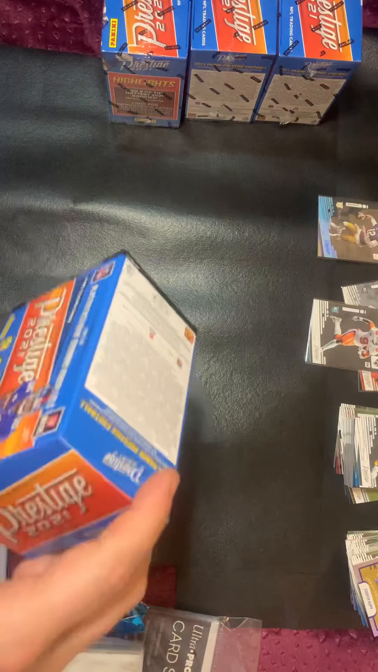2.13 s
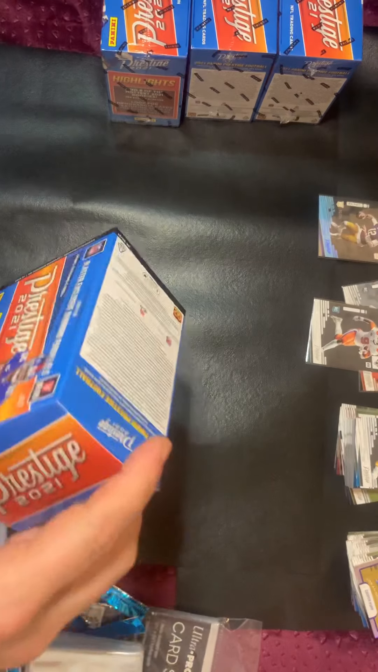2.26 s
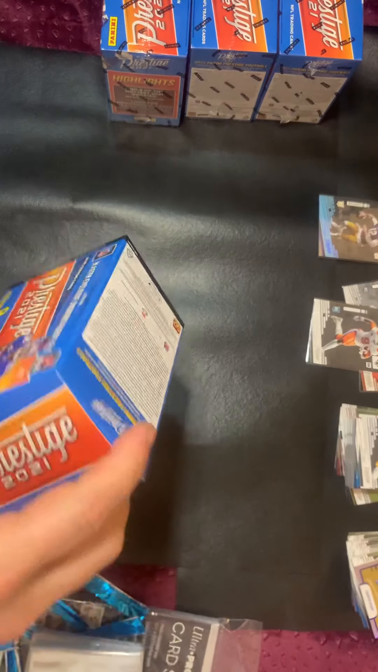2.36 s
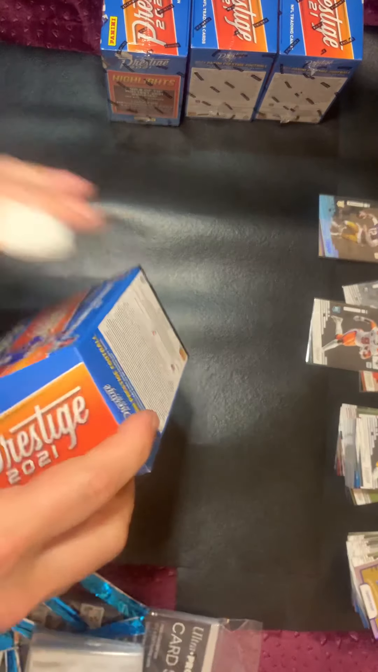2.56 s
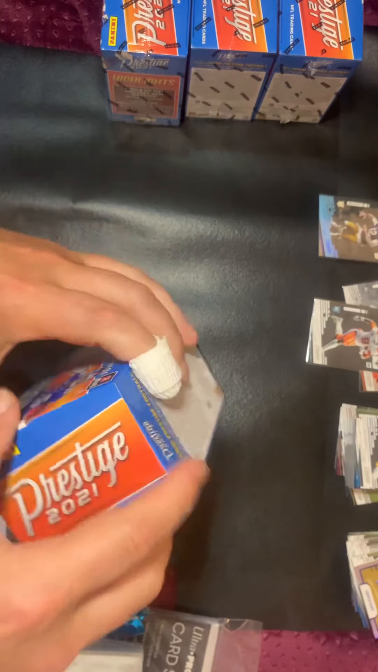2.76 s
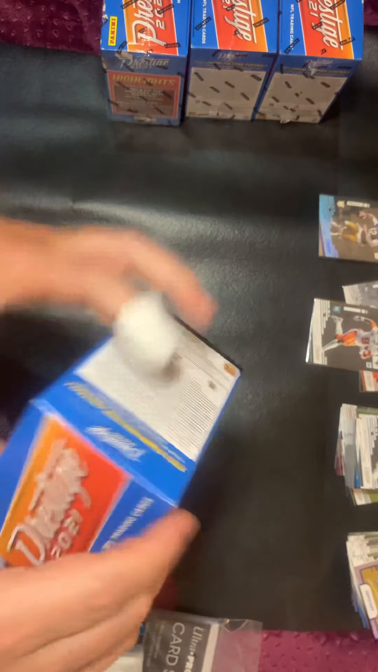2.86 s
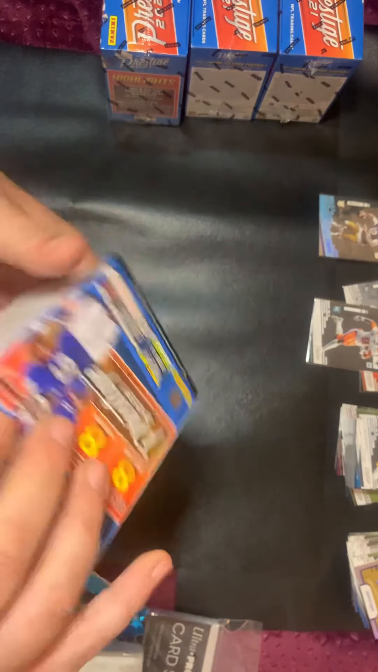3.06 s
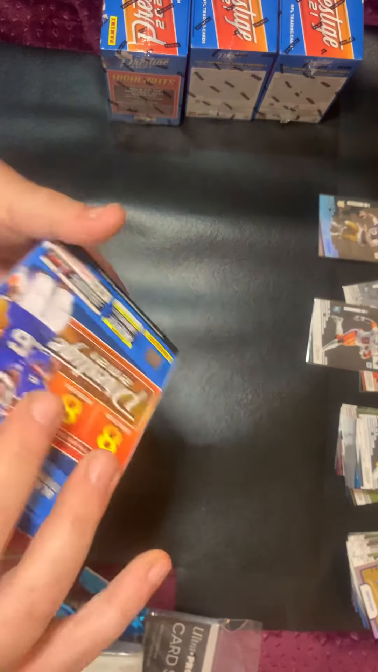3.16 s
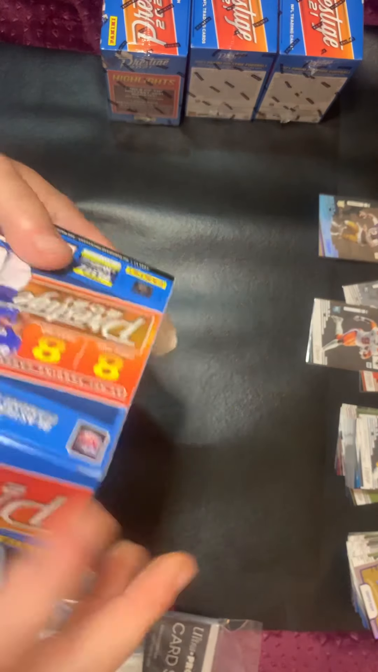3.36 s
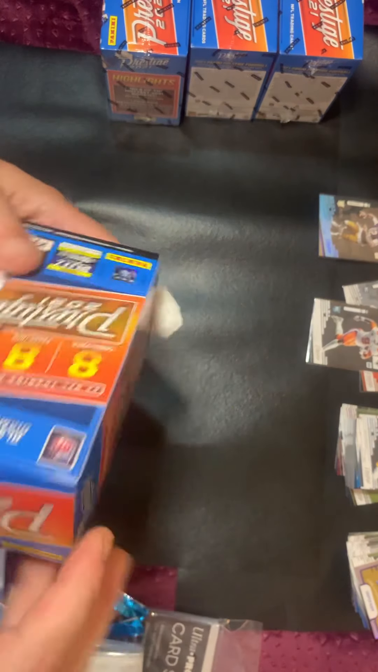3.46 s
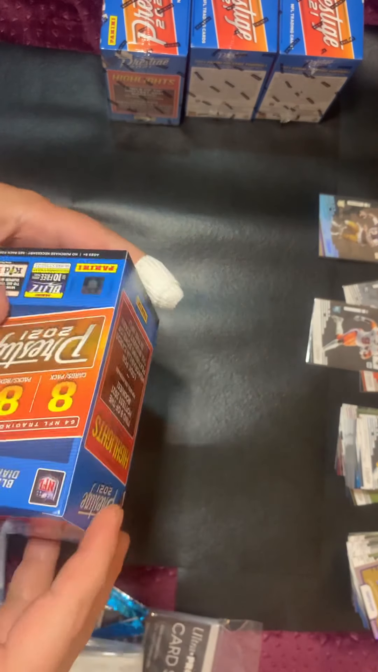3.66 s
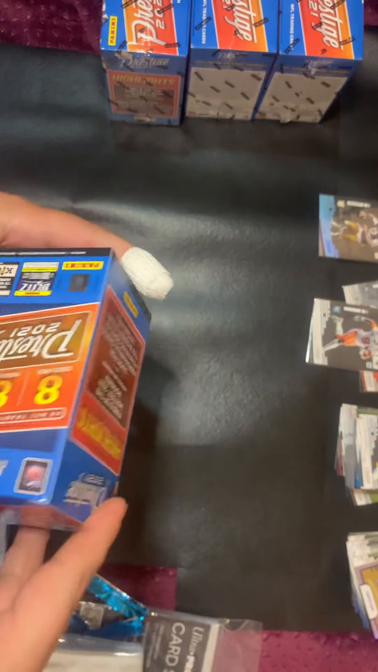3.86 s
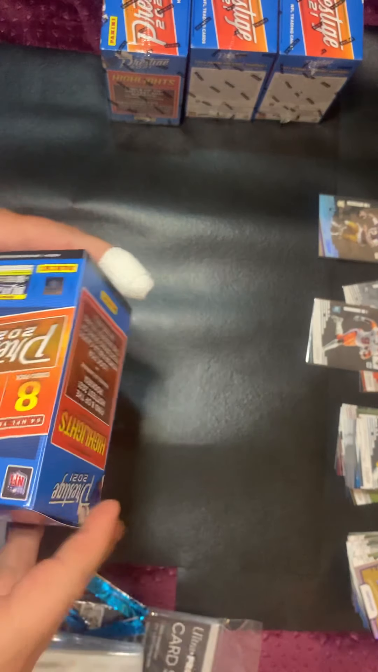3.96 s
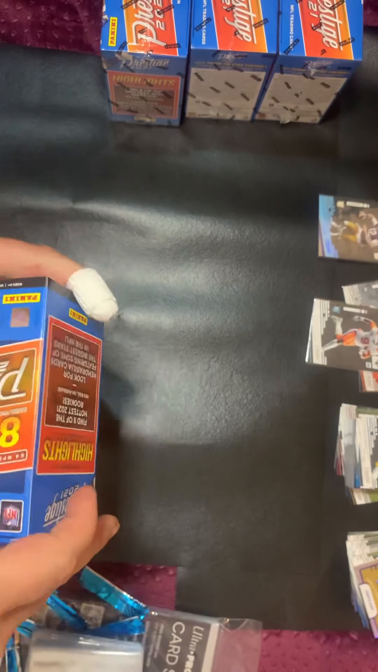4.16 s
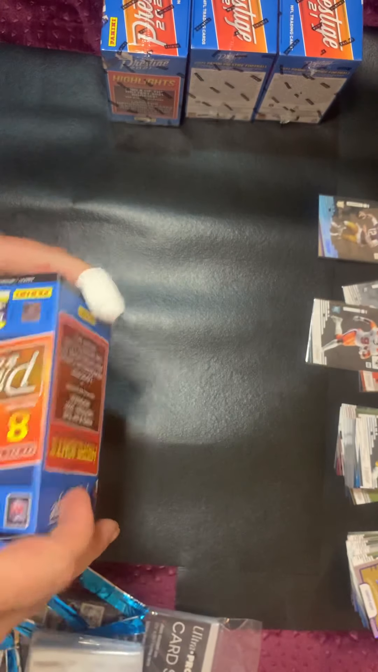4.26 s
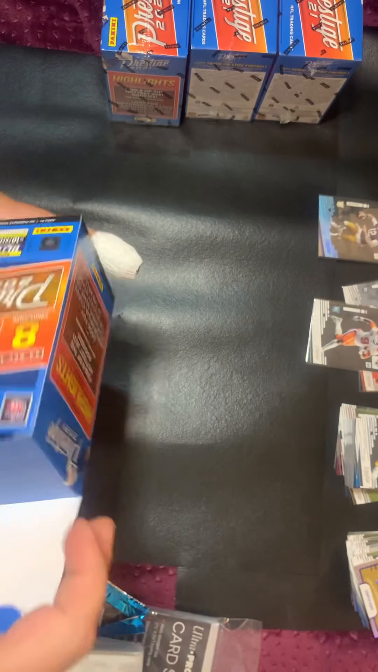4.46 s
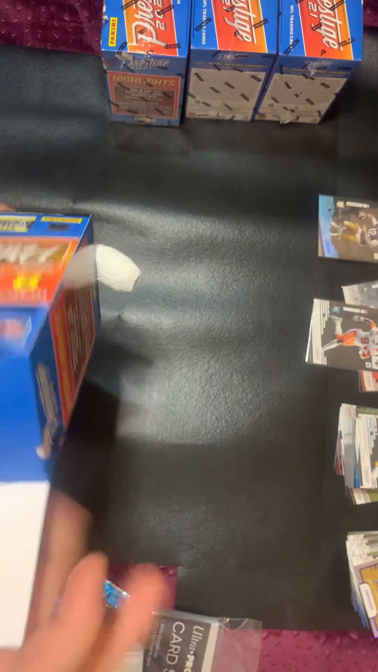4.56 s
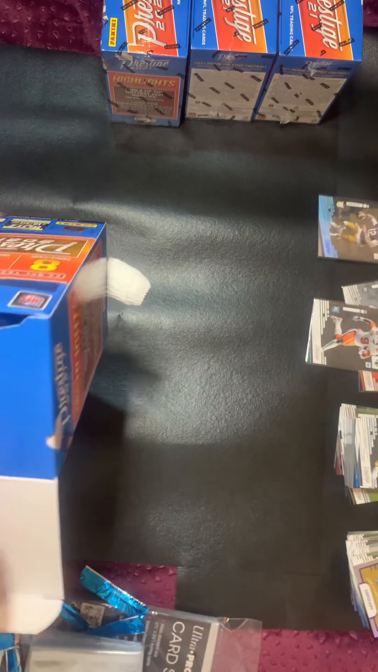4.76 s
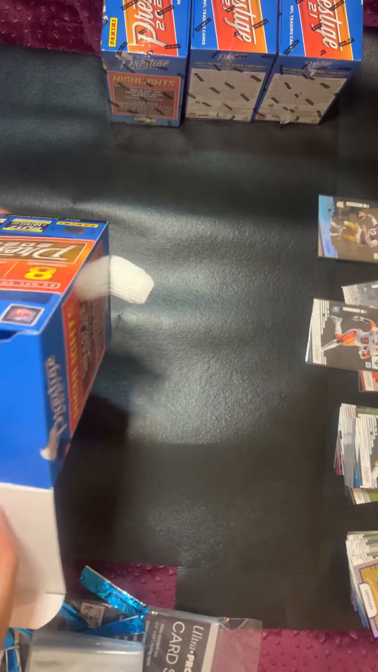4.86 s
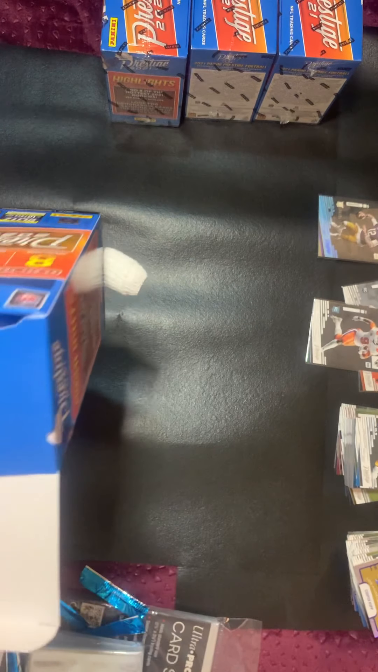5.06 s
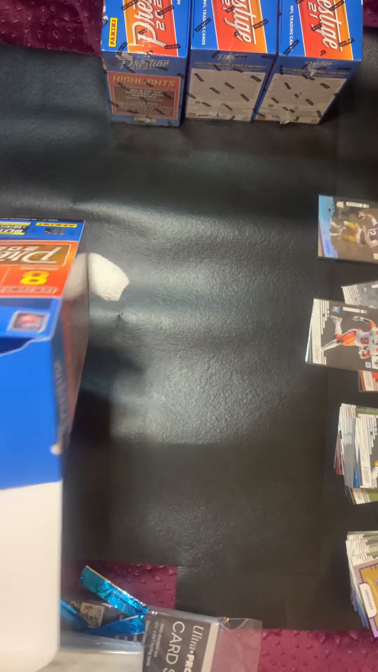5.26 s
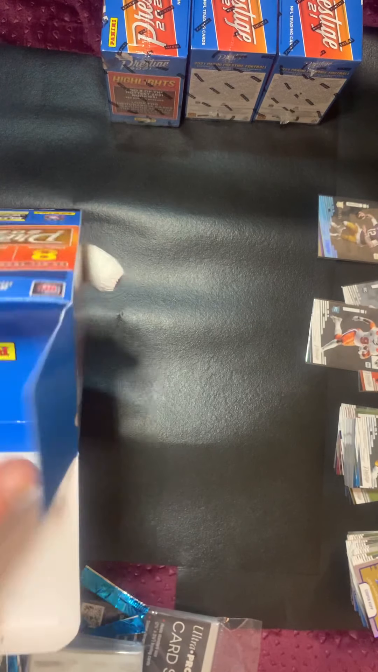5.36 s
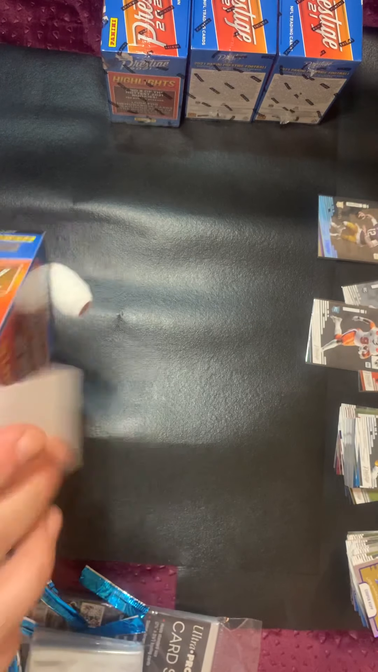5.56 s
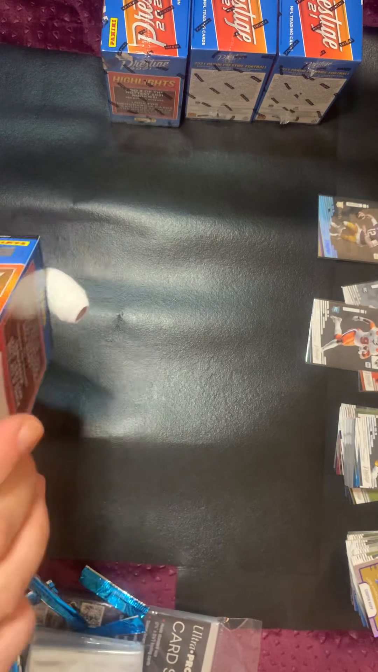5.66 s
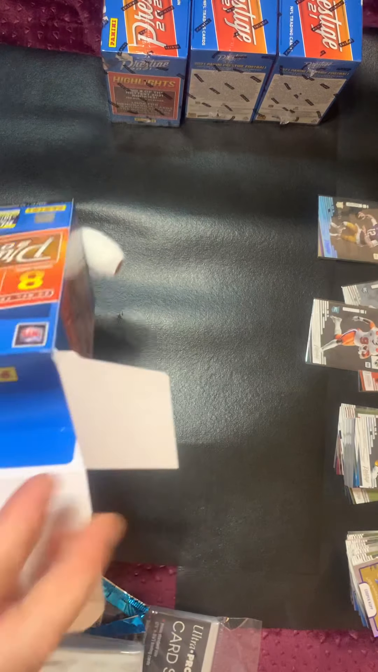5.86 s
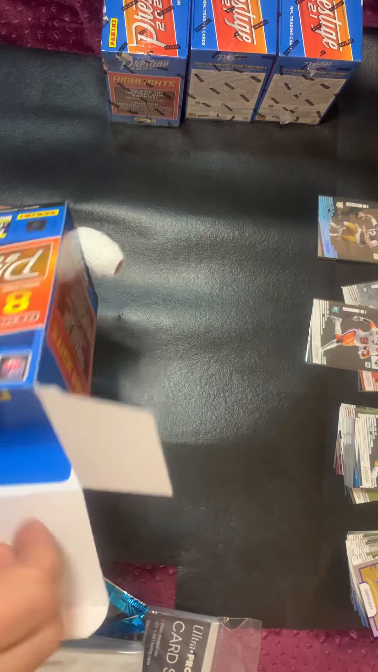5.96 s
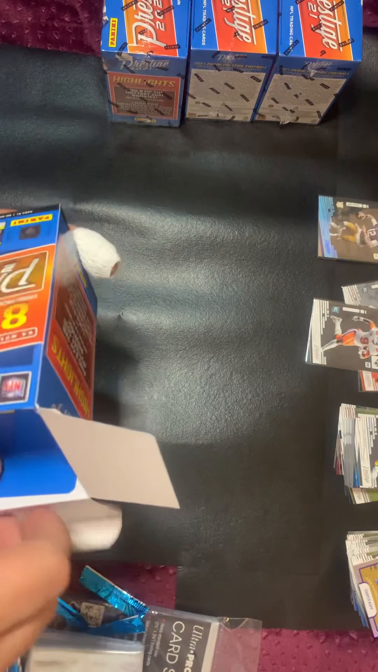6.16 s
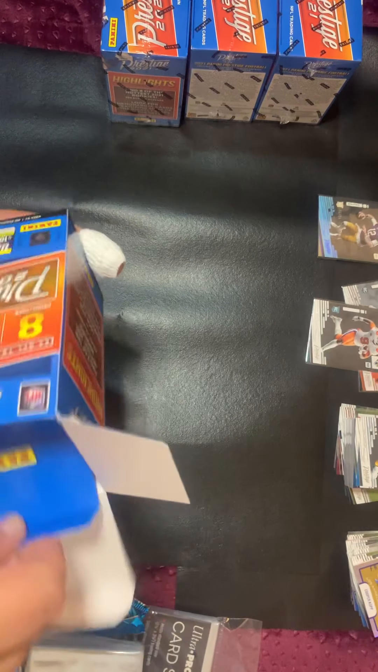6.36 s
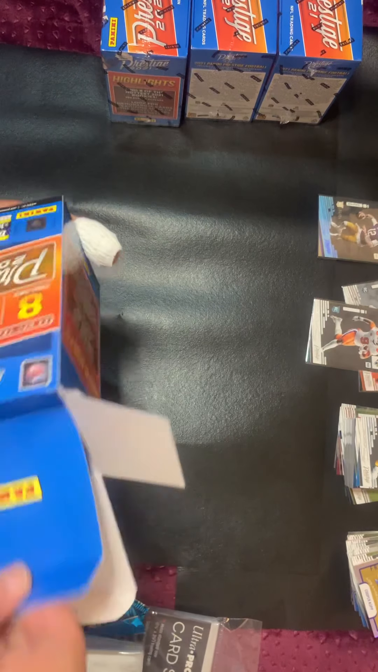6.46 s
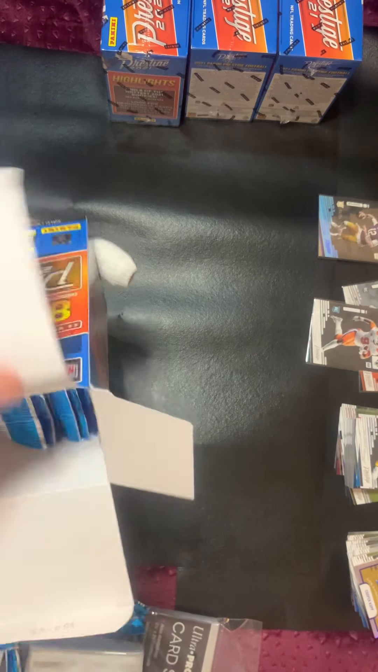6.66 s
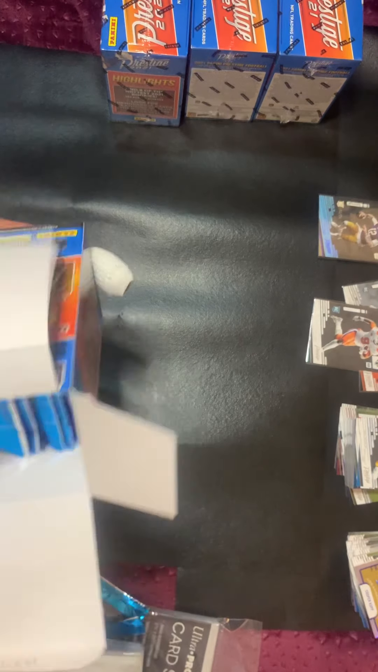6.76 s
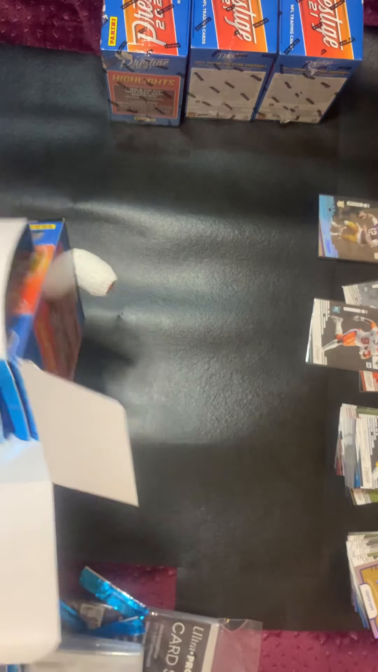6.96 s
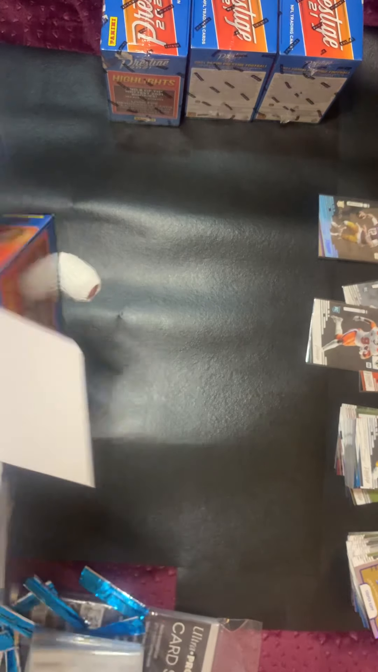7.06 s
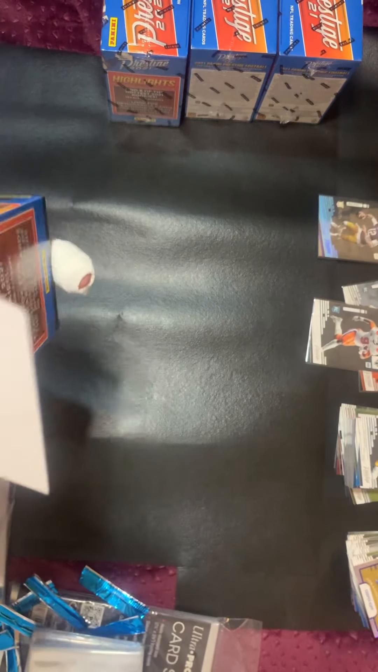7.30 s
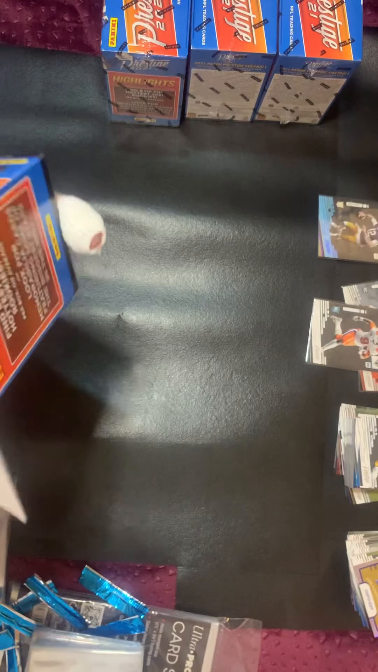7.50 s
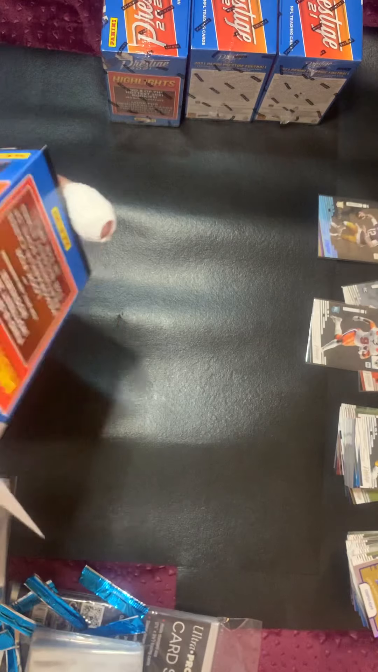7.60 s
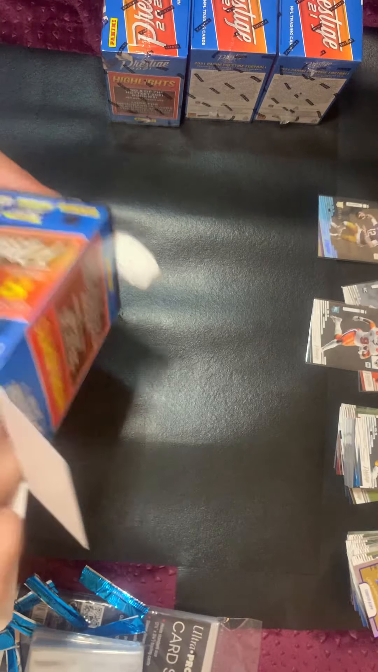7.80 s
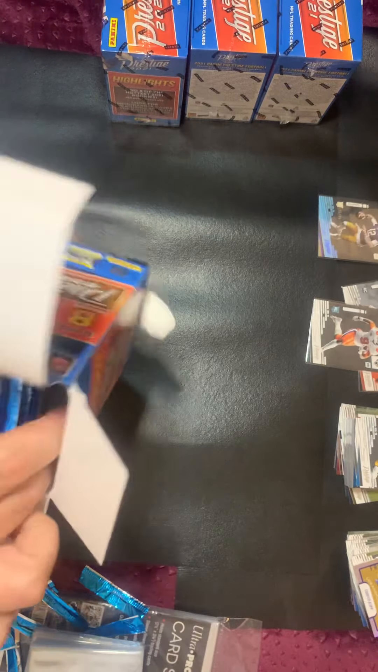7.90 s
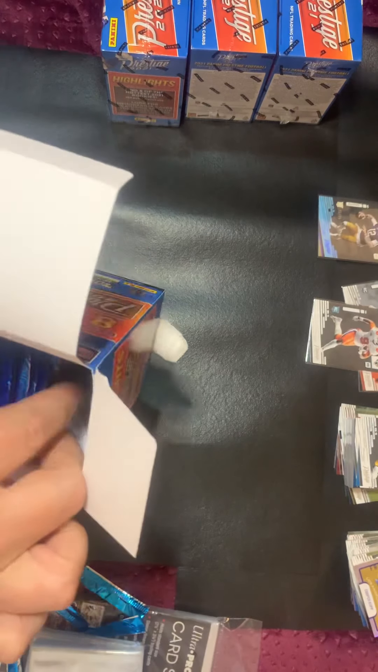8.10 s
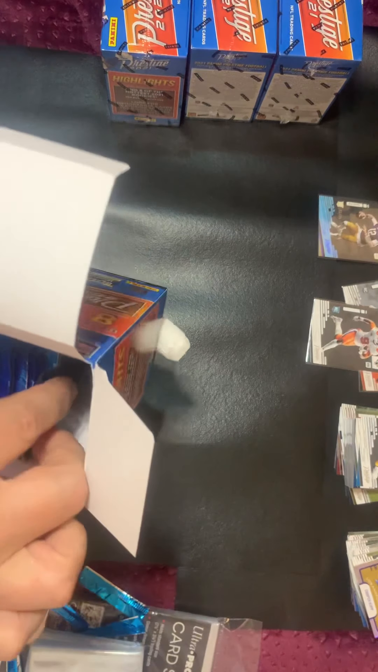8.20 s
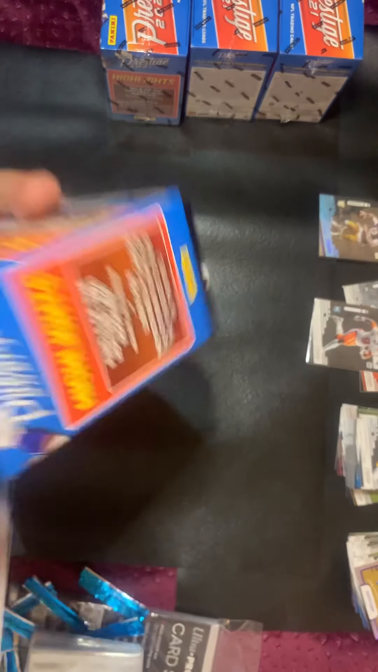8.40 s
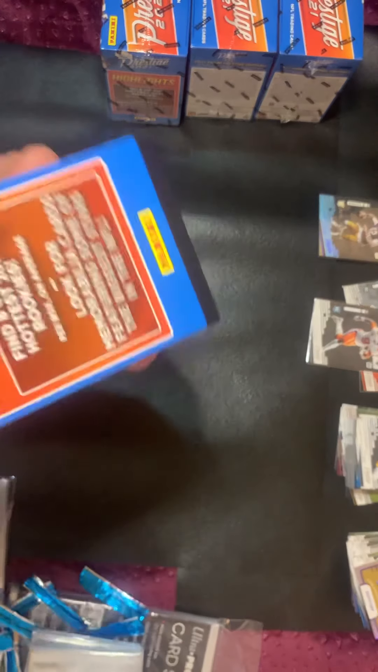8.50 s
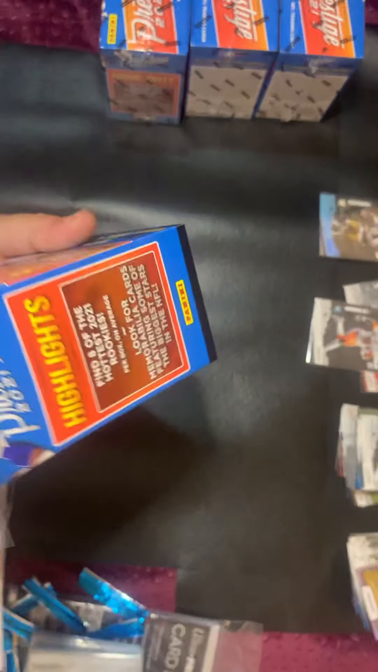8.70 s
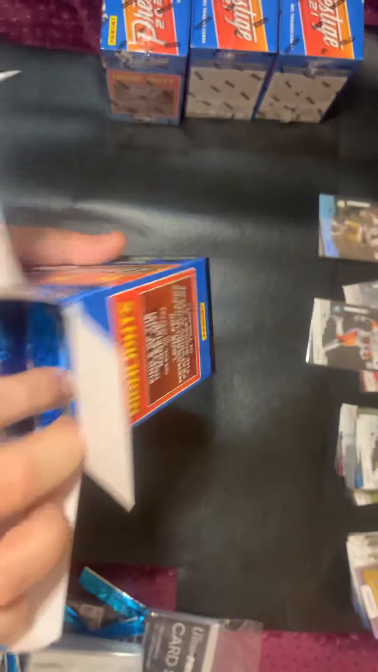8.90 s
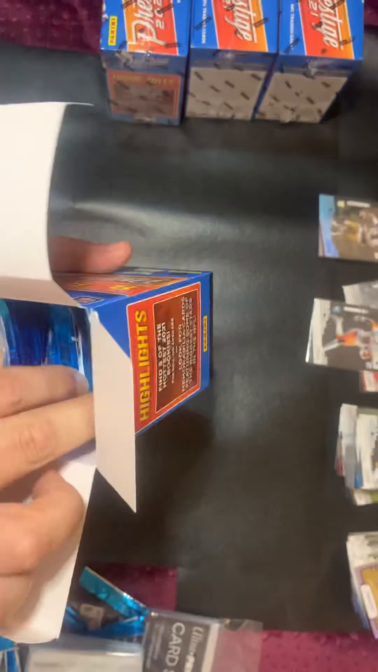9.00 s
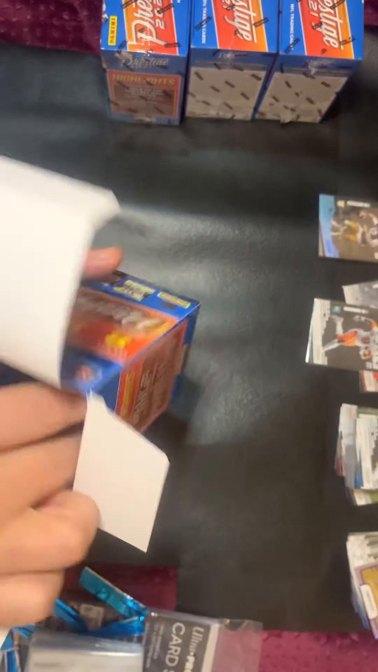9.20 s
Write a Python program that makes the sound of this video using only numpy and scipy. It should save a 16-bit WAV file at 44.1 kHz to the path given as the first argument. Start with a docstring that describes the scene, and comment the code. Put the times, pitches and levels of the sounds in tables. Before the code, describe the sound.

Close handling of a small carton: film crackle, a near-quiet lull, soft taps, sharp tearing cracks, then restless card rubbing and foil ticks.

```python
"""A small cardboard box, close to the microphone, is handled: first thin plastic wrap rustles, then the box is
turned over, its lid is torn free with sharp cracks, flaps are folded back and fingers scrape about inside.
Cracks, taps, slips and ticks of wrap and foil are short bursts that ring the same stiff panels; card and wrap
rub as showers of tiny random slips, and a few folds squeak. Behind them lie faint room air and a low 60 Hz hum,
its level set by a table, with small random wavering."""
import sys
import numpy as np
from scipy import signal
from scipy.fft import rfft, irfft, next_fast_len
from scipy.io import wavfile

SR = 44100
rng = np.random.default_rng(int(sys.argv[2]) if len(sys.argv) > 2 else 0)


def output_pcm(signal):
    """Save a mono or channel-first signal as 16-bit PCM at the path in sys.argv[1].

    Samples are clipped to [-1, 1] before scaling.
    """
    pcm = np.clip(np.atleast_2d(signal).T, -1, 1) * 32767
    wavfile.write(sys.argv[1], SR, np.round(pcm).astype(np.int16))


N = 407484

# resonances of the box panels: (pitch [Hz], width [Hz], level [dB])
PANEL_MODES = [(679, 138, -0.5), (820, 108, -2.5), (988, 82, -6.5), (1102, 160, -5.5), (1250, 153, -2.5),
               (1450, 142, -2), (1756, 215, -5.5), (2050, 1000, -12)]
# resonances of the whole box and the air in it: (pitch [Hz], width [Hz], level [dB])
CAVITY_MODES = [(120, 55, 1.5), (208, 62, 2.5), (279.4, 39, 2), (429, 104, -3)]
# bending resonances of short torn edges and tabs: (pitch [Hz], width [Hz], level [dB])
TAB_MODES = [(2050, 290, -8.5), (2516, 210, -2), (3300, 480, -7.5), (4265, 400, -1.5)]
# tone colour of snapping card fibres: (frequency [Hz], level [dB])
FIBRE_COLOUR = [(1000, -12.5), (2300, -7), (3500, -6.5), (5000, -4), (7200, -1.5), (12500, -7.5),
                (16000, -4.5)]
# plastic wrap and foil packs buckle with a bright tick: (time [s], level [dB])
CRINKLE_TICKS = [(0.0504, -48), (0.1593, -38.5), (0.1804, -47), (0.4, -53), (0.4316, -46), (0.4767, -48.5),
                 (0.5945, -44.5), (0.626, -36.5), (0.6497, -25), (0.8797, -41.5), (1.0986, -38),
                 (1.1053, -35), (1.1352, -46), (1.3617, -40.5), (1.4529, -36), (1.6715, -45), (1.6988, -43),
                 (2.0037, -45.5), (2.13, -54), (6.692, -47.5), (7.4794, -29), (7.6437, -36.5),
                 (7.68, -33.5), (7.7446, -31.5), (7.87, -54), (7.9865, -39), (8.0101, -45), (8.1363, -41),
                 (8.152, -33), (8.161, -35.5), (8.2082, -47.5), (8.326, -35.5), (8.4375, -45),
                 (8.7402, -40.5), (8.777, -32.5), (8.8449, -39), (8.8864, -32), (8.924, -44), (9.0273, -43),
                 (9.054, -39), (9.1296, -47.5)]
SHUT_HZ, OPEN_HZ = 830, 1270   # panels ring low while the box is shut, higher once the flaps are free


def hits():
    """Cracks, dull taps, stuttering slips and bright crinkles all ring the same box, in different shares."""
    # lid and flaps crack, give and knock:
    # (time [s], thump of the box [dB], panel knock [dB], fibre snap [dB], pitch of the struck panel [Hz])
    crack_list = [(0.077, -45.5, -37.5, -30.5, 836), (1.431, -39.5, -36.5, -38, 856),
                  (2.7456, -44.5, -38, -45.5, 1227), (4.2538, -46, -31.5, -33, 830),
                  (4.2719, -56, -32, -25.5, 1200), (4.308, -43, -25.5, -23, 914),
                  (4.3298, -16, -18.5, -21.5, 970), (4.333, -30, -18.5, -23, 710),
                  (4.4777, -34, -38.5, -39, 1050), (4.4849, -34.5, -32.5, -29.5, 1030),
                  (4.7129, -51, -31, -37, 1560), (4.7181, -62, -40, -35, 1480),
                  (4.7238, -44, -29.5, -37, 1490), (5.043, -69, -43, -42.5, 1570),
                  (5.2195, -30.5, -22.5, -34, 1470), (5.3248, -48, -39.5, -44, 1150),
                  (5.6217, -58, -40, -38, 1300), (5.9641, -41, -41, -44.5, 1040),
                  (5.9881, -44.5, -39.5, -44, 1030), (6.352, -30, -41, -37, 810),
                  (6.5636, -37, -39, -41.5, 1240), (6.797, -34.5, -20, -34.5, 1487),
                  (6.8126, -34.5, -24.5, -45, 1390), (7.1364, -43.5, -41, -41, 1100),
                  (7.323, -32.5, -27, -31, 820), (7.5071, -44, -39, -29, 1050),
                  (7.5824, -34, -18.5, -24, 830), (7.9788, -69, -39, -39.5, 1120),
                  (8.116, -43, -32.5, -34, 870), (8.384, -37.5, -33.5, -40, 1060),
                  (8.525, -51, -36, -38, 1120), (8.7646, -49, -37, -36, 1190), (8.9424, -50, -41, -43, 965),
                  (9.097, -37, -37.5, -45, 1010)]
    # soft fingertips land on the box: (time [s], thump of the box [dB], panel knock [dB])
    tap_list = [(0.544, -59, -32.5), (0.7747, -43.5, -40.5), (0.821, -41.5, -36), (1.528, -61, -41),
                (2.288, -58, -64), (2.389, -72, -59.5), (2.445, -64, -47.5), (2.634, -65, -54.5),
                (2.787, -48, -48), (3.029, -61, -49), (3.118, -74, -54), (3.211, -59, -46),
                (3.273, -52, -48.5), (3.482, -48, -42.5), (3.4965, -66, -41), (3.6489, -44, -32),
                (3.695, -39, -39), (3.764, -38.5, -36), (3.8959, -39, -34.5), (3.917, -51, -28),
                (4.184, -85, -39), (4.506, -36.5, -62), (4.802, -66, -36.5), (5.3107, -44, -39),
                (6.497, -60, -49), (6.9716, -44, -45.5), (7.175, -40, -52), (7.223, -45, -52),
                (7.803, -48, -37.5), (8.837, -48, -49)]
    # a tucked flap sticks and slips before it slides out: (time [s], panel knock [dB])
    slip_list = [(6.202, -33), (6.2185, -35), (6.2293, -40), (6.237, -36), (6.242, -35), (6.272, -43)]
    # card tears, film pops, skin lands softly:
    # (size of the sudden give against the small breaks around it, decay of those breaks [s])
    card, film, skin = (0.6, 0.0023), (1, 0.00068), (0.096, 0.003)
    flaps_free_s, stiff_box_hz, slack_box_hz = 4.6, 360, 218   # flaps brace the box until they come free
    tap_hz, tap_box_hz = 778, 152   # pitch of a tapped panel and of the tapped box
    tap_snap_db, slip_snap_db = -12.5, -16   # click of the skin or flap edge, relative to the knock
    tick_knock_db, tick_thump_db = -15, -24   # how little a tick shakes the box, relative to the tick

    blows = []
    for s, *levels_and_pitch in crack_list:
        box_hz = stiff_box_hz if s < flaps_free_s else slack_box_hz
        blows.append((s, *levels_and_pitch, box_hz, *card))
    for s, thump, knock in tap_list:
        blows.append((s, thump, knock, knock + tap_snap_db, tap_hz, tap_box_hz, *skin))
    for s, db in slip_list:
        blows.append((s, db + tick_thump_db, db, db + slip_snap_db, OPEN_HZ, slack_box_hz, *film))
    for s, db in CRINKLE_TICKS:
        blows.append((s, db + tick_thump_db, db + tick_knock_db, db, 1428, slack_box_hz, *film))

    out, t = np.zeros(N), np.arange(-SR // 50, SR // 10) / SR
    for s, *blow in blows:
        add(out, s + t[0] + 0.0007, hit(t, *blow))   # the give comes 0.7 ms after the listed time
    return out


def hit(t, thump_db, knock_db, snap_db, panel_hz, box_hz, sudden, snap_s, focus_db=4.5):
    """Fibres snap first, the struck panel rings, and the whole box follows a little later."""
    breaks = fracture(t, decay_s=snap_s, first=sudden, swell_s=0.0004, wash=0.11)
    tabs = resonate(breaks, regrip(TAB_MODES, detune=0.18, scatter_db=7.5))
    snap = colour(breaks, FIBRE_COLOUR) + from_db(0.5) * tabs
    # light contacts that hardly move the panel are the brightest
    bright_hz = np.clip(9000 * from_db(3.6 * (snap_db - knock_db)), 3000, 18000)
    snap = cut(snap, bright_hz, "low", order=1)

    panels = regrip(PANEL_MODES, detune=0.041, scatter_db=2.0)
    panels[:, 2] -= focus_db * np.log2(panels[:, 0] / panel_hz) ** 2   # modes near the panel's pitch ring most
    knock = resonate(fracture(t, decay_s=0.003, first=sudden, swell_s=0.0004, wash=0.04), panels)
    # the struck panel's own note stands out: 66 Hz wide, 2.5 dB
    own_note = resonate(1.0 * (t == 0), [(panel_hz, 66, 2.5)])
    knock = cut(knock + own_note, 4200, "low")

    push = np.exp(-((t - 0.0025) / 0.00053) ** 2)   # a smooth shove, 2.5 ms after the give
    box = regrip(CAVITY_MODES, detune=0.182, scatter_db=4.5)
    box[:, 2] -= 2 * focus_db * np.log2(box[:, 0] / box_hz) ** 2
    thump = cut(resonate(push, box), 780, "low")
    return at_level(snap, snap_db) + at_level(knock, knock_db) + at_level(thump, thump_db)


def fracture(t, decay_s, first, swell_s, wash):
    """Small breaks swell up to one sudden give at t = 0 and die quickly after it."""
    build_up = np.where(t < 0, np.exp(-np.abs(t) / swell_s), 1)
    shape = np.exp(-np.abs(t) / decay_s) * build_up
    shape = shape + wash * np.exp(-np.abs(t) / 0.012)   # a faint wash of noise around the give
    run = rng.standard_normal(len(t)) * shape
    return run / np.sqrt(np.sum(run ** 2)) + first * (t == 0)


def regrip(modes, detune, scatter_db):
    """The grip and the point of contact shift each resonance and change its share."""
    hz, width, db = np.transpose(modes)
    shift, share = rng.standard_normal((2, len(hz)))
    return np.transpose([hz * np.exp(detune * shift), width, db + scatter_db * share])


def at_level(x, db):
    """Scales a blow to the energy of a steady sound of this level lasting 10 ms."""
    return from_db(db) * x / np.sqrt(np.sum(x ** 2) / (SR / 100) + 1e-20)


def rubbing():
    """Card sticks and slips: coarse slips shake panels and box, fine ones hiss at the edge, fibres crackle."""
    # card slides on card and skin: (start [s], length [s], panel rasp [dB], swell from start to end [dB],
    # flexing of the box before its 9 dB cut below [dB relative to rasp], edge hiss [dB relative to rasp])
    stroke_list = [(1.449, 0.57, -58.5, -10.5, 6.5, 9), (2.733, 0.35, -69, -24, 7.5, -2),
                   (3.094, 0.17, -58.5, -5, 0, -4.5), (3.493, 0.087, -52, 22.5, 0, -10.5),
                   (3.65, 0.2, -57.5, -4, 8.5, -10), (3.882, 0.11, -48.5, -13, 2.5, -6.5),
                   (3.978, 0.097, -43.5, -15, -12, -13.5), (4.053, 0.12, -57.5, 7, 5, -14.5),
                   (4.187, 0.083, -40.5, -5, -7, -15), (4.243, 0.1, -38, 0, -10, -1.5),
                   (4.39, 0.071, -44, -1, 0, -4), (4.494, 0.17, -51, 0, 6.5, 0.5),
                   (4.729, 0.17, -45.5, 2.5, -1, -5.5), (4.966, 0.028, -46, -10, -1, -12),
                   (5.018, 0.14, -43.5, 7.5, 4.5, -4), (5.186, 0.25, -51.5, -17.5, -2, -2),
                   (5.392, 0.23, -45, -12, -4, -2.5), (5.711, 0.18, -52, 5, -3, 0.5),
                   (5.998, 0.12, -38.5, 8.5, -7.5, -4.5), (6.139, 0.17, -41, 18, -3.5, -9.5),
                   (6.243, 0.08, -37.5, 5, -0.5, 1.5), (6.42, 0.15, -49, -21, -4, -8),
                   (6.566, 0.082, -45, -10.5, 6, -0.5), (6.658, 0.18, -54.5, 3.5, -2, 7.5),
                   (6.888, 0.11, -50, 16.5, 0.5, -2.5), (7.148, 0.13, -52, 3, 10.5, -5.5),
                   (7.318, 0.18, -47.5, 6, 1, -7), (7.425, 0.18, -46, 20, -2.5, -3.5),
                   (7.659, 0.15, -45, -3.5, -1, -4), (7.825, 0.096, -43, -4, -3, -5),
                   (7.932, 0.11, -43.5, -1, -10, 0), (8.069, 0.037, -46, 6, -3, -1),
                   (8.182, 0.24, -46.5, 11.5, 1, -5), (8.48, 0.11, -42.5, 1.5, -6, -8),
                   (8.6, 0.19, -49.5, 4, -0.5, -6.5), (8.834, 0.15, -48, 6.5, -1, -2),
                   (9.003, 0.094, -45.5, -0.5, 3.5, -3), (9.138, 0.083, -50.5, 11, 3.5, -5.5)]
    attack_s, release_s = 0.021, 0.025
    lid_gives_s = 4.3
    fibre_crackle_db = -8   # single fibres that catch and break, relative to the edge hiss

    s, length, db, swell_db, flex_db, hiss_db = np.transpose(stroke_list)
    rasp, flex, hiss = [gestures(zip(s, length, db + share_db, swell_db), attack_s, release_s)
                        for share_db in (0, flex_db, hiss_db)]
    pitch_hz = np.where(np.arange(N) / SR < lid_gives_s, SHUT_HZ, OPEN_HZ)

    coarse = rms_one(grains(per_s=260, spread_db=3.5, clump_db=2.0, clump_rate=95, smooth=0.45))
    fine = rms_one(grains(per_s=920, spread_db=2.0, clump_db=3.3, clump_rate=90, smooth=1.0))
    fibres = ticks(per_s=110, spread_db=5.0, low_hz=1200, high_hz=7000)

    panels = gripped(coarse, PANEL_MODES, shift_db=4.5, pitch_hz=pitch_hz, focus_db=6.0)
    panels = bend(cut(panels, 4600, "low"), share=0.05, rate=9)
    box = rms_one(cut(resonate(coarse, CAVITY_MODES), 520, "low")) * from_db(-9.0)
    tabs = gripped(coarse, TAB_MODES, shift_db=5.5, pitch_hz=3 * pitch_hz, focus_db=5)
    edge = rms_one(colour(fine + 0.2 * coarse, FIBRE_COLOUR)) + from_db(-10.0) * tabs
    edge = rms_one(cut(edge, 5200, "low", order=1))
    return rasp * panels + flex * box + hiss * (edge + from_db(fibre_crackle_db) * fibres)


def gripped(x, modes, shift_db, pitch_hz, focus_db):
    """Modes near the rubbed spot's pitch ring most; the shifting grip damps now one, now another."""
    shares = np.array([from_db(shift_db * drift(11) - focus_db * np.log2(hz / pitch_hz) ** 2)
                       for hz, _, _ in modes])
    rings = np.array([(-1) ** k * resonate(x, [mode]) for k, mode in enumerate(modes)])
    power = np.mean(rings ** 2, axis=1) @ shares ** 2
    return np.sum(shares * rings, axis=0) / np.sqrt(power)   # the overall level stays even


def bend(x, share, rate):
    """The pressure of the fingers bends the card, so that its resonances wander up and down."""
    at = np.cumsum(np.exp(share * drift(rate)))   # reads the sound now faster, now slower
    return rms_one(np.interp(at, np.arange(N), x, period=N))


def wrap():
    """Thin film buckles in a shower of tiny creases: a low rustle under a bright crackle with lone pops."""
    # plastic wrap is scrunched or brushed: (start [s], length [s], crackle [dB],
    # swell from start to end [dB], low rustle [dB relative to crackle])
    scrunch_list = [(0.0, 0.072, -40, 17.5, -7.5), (0.095, 0.083, -45.5, 1.5, -10.5),
                    (0.195, 0.16, -47, -9, -6), (0.385, 0.11, -58, 0.5, -7), (0.537, 0.12, -46.5, 3.5, -2),
                    (0.717, 0.18, -62, -14, -0.5), (0.838, 0.12, -48, 7, -4.5),
                    (0.984, 0.16, -48, 14.5, -6), (1.143, 0.12, -62, 6, -5.5),
                    (1.325, 0.05, -54.5, 6, -9.5), (1.382, 0.014, -40.5, 2.5, -4.5),
                    (1.438, 0.35, -41, -1.5, -11.5), (1.768, 0.22, -46.5, 3.5, -15),
                    (2.015, 0.11, -56.5, 9, -9), (2.174, 0.41, -71.5, -4, -7),
                    (2.679, 0.021, -45, 14, -16.5)]
    # tone colour of the low rustle: (frequency [Hz], level [dB])
    rustle_colour = [(100, -5.5), (330, -4.5), (520, -5.5), (820, 2), (1780, 0), (2400, -1.5),
                     (4500, -33.5)]
    # tone colour of the bright crackle: (frequency [Hz], level [dB])
    crackle_colour = [(1400, -52), (2700, -7.5), (4700, 4.5), (6500, 7), (12500, 2), (16000, -3)]
    attack_s, release_s = 0.002, 0.015
    settle_s, settle_db = 0.02, -14   # after each tick the film settles with a few smaller pops
    pops_db = -16.5   # lone pops, relative to the crackle

    s, length, db, swell_db, rustle_db = np.transpose(scrunch_list)
    crackle, rustle = [gestures(zip(s, length, db + share_db, swell_db), attack_s, release_s)
                       for share_db in (0, rustle_db)]
    after_ticks = [(at, settle_s, tick_db + settle_db, 0) for at, tick_db in CRINKLE_TICKS]
    settling = gestures(after_ticks, attack_s, settle_s / 2)

    creases = grains(per_s=1500, spread_db=3.0, clump_db=3.0, clump_rate=120, smooth=0.65)
    pops = ticks(per_s=170, spread_db=9.0, low_hz=3600, high_hz=13500)
    body = rms_one(colour(creases, rustle_colour))
    bright = rms_one(colour(creases, crackle_colour))
    return rustle * body + crackle * (bright + from_db(pops_db) * pops) + settling * pops


def squeaks():
    """Quick slips in a fold excite one narrow resonance."""
    # creases that squeak as they fold: (time [s], level [dB], pitch [Hz], half length [s])
    squeak_list = [(4.4794, -18, 4030, 0.0023), (5.046, -37, 3130, 0.0041), (5.088, -35, 3100, 0.0039),
                   (5.624, -35.5, 3700, 0.0074), (7.178, -38.5, 3080, 0.0064)]
    out, t = np.zeros(N), np.arange(-SR // 20, SR // 20) / SR
    for s, db, hz, half_length in squeak_list:
        swell = np.exp(-(t / half_length) ** 2)
        burst = swell * resonate(rng.standard_normal(len(t)), [(hz, 380, 0)])
        add(out, s + t[0], from_db(db) * rms_one(burst) * np.sqrt(np.mean(swell ** 2)))
    return out


def gestures(rows, attack_s, release_s):
    """Each hand movement sets in, swells or fades steadily, and dies away; overlapping ones add in power."""
    power = np.zeros(N)
    for s, length, db, swell_db in rows:
        t = np.arange(int((length + 8 * release_s) * SR)) / SR
        hold = from_db(db + swell_db * (np.minimum(t / length, 1) - 0.5))   # db is reached halfway
        set_in = np.minimum(t / attack_s, 1)
        die_away = np.exp(-np.maximum(t - length, 0) / release_s)
        add(power, s, (hold * set_in * die_away) ** 2)
    return np.sqrt(power)


def grains(per_s, spread_db, clump_db, clump_rate, smooth):
    """Friction: tiny slips of uneven size that come in clumps, over a smooth hiss."""
    sizes = from_db(spread_db * np.minimum(rng.exponential(1, N), 4)) * rng.choice([-1, 1], N)
    slips = rms_one(sizes * (rng.random(N) < per_s / SR)) + smooth * rng.standard_normal(N)
    return slips * from_db(clump_db * drift(clump_rate))


def ticks(per_s, spread_db, low_hz, high_hz, count=10):
    """Lone tiny breaks of uneven size, each dealt at random to one of a few broad resonances."""
    sizes = from_db(spread_db * np.minimum(rng.exponential(1, N), 2)) * rng.choice([-1, 1], N)
    breaks = sizes * (rng.random(N) < per_s / SR)
    dealt = rng.integers(0, count, N)
    out = np.zeros(N)
    for k, hz in enumerate(np.geomspace(low_hz, high_hz, count)):
        out += rms_one(resonate(breaks * (dealt == k), [(hz, hz / 2, 0)]))
    return rms_one(out)


def resonate(x, modes):
    """Rings resonances side by side, with alternating signs."""
    out = 0
    for k, (hz, width, db) in enumerate(modes):
        r = np.exp(-np.pi * width / SR)   # a wider resonance dies away faster
        poles = [1, -2 * r * np.cos(2 * np.pi * hz / SR), r * r]
        ring = (1 - r * r) / 2 * signal.lfilter([1, 0, -1], poles, x + 1e-18)
        out = out + (-1) ** k * from_db(db) * ring
    return out


def colour(x, spectrum, size=2048):
    """Filters to the given spectrum with no sound ahead of its cause (minimum phase)."""
    cepstrum = irfft(np.log(from_db(at_hz(spectrum, np.linspace(0, SR / 2, size // 2 + 1)))))
    cepstrum[1:size // 2] *= 2
    cepstrum[size // 2 + 1:] = 0
    return signal.oaconvolve(x, irfft(np.exp(rfft(cepstrum))))[:len(x)]


def cut(x, hz, kind, order=2):
    """Keeps the lows, the highs or a band, with a smooth Butterworth slope."""
    return signal.sosfilt(signal.butter(order, hz, kind, fs=SR, output="sos"), x)


def drift(rate):
    """Slow random wandering of spread 1, with rate new values a second."""
    at = np.arange(N) / SR * rate
    return rms_one(np.interp(at, np.arange(8192), rng.standard_normal(8192)))


def at_hz(points, hz):
    """Reads a table on a log-frequency axis."""
    f, value = np.transpose(points)
    return np.interp(np.log(hz + 1), np.log(f), value)


def from_db(db):
    """Turns decibels into a gain."""
    return 10 ** (np.asarray(db) / 20)


def rms_one(x):
    """Scales a signal to an rms level of 1."""
    return x / np.sqrt(np.mean(x ** 2) + 1e-20)


def add(out, s, sound):
    """Mixes a sound in, starting at time s."""
    at = int(np.clip(s * SR, 0, N - 1))
    out[at:at + len(sound)] += sound[:N - at]


def ports(x):
    """The direct sound reaches the two microphone ports with different phase and level."""
    # how far left leads right: (frequency [Hz], phase [radians])
    phase_lead = [(0, 0), (230, -.5), (500, -.2), (740, 1.2), (1020, .1), (1450, .1), (2500, 1.6),
                  (3900, .9), (6300, 6.1), (7500, 6.4), (9700, 9.4), (12000, 12.5), (14700, 15.6)]
    # left minus right: (frequency [Hz], level [dB])
    balance = [(60, -6), (200, -3.5), (700, -4.5), (1300, -0.7)]
    size = next_fast_len(N + 4096)
    hz = np.arange(size // 2 + 1) * SR / size
    # half of each difference goes to the left port, the opposite half to the right
    half = np.exp(0.5j * np.interp(hz, *np.transpose(phase_lead))) * from_db(at_hz(balance, hz) / 2)
    return irfft(rfft(x, size) * np.array([half, 1 / half]), size)[:, :N]


def scatter(x, wet_db, order=4):
    """The moving hands and flaps reflect sound to each port along short paths of ever-changing strength."""
    out = np.zeros((2, N))
    for side in out:
        for lag in (rng.uniform(0.00019, 0.0025, order) * SR).astype(int):
            side += np.pad(x, (lag, 0))[:N] * drift(24)
    return from_db(wet_db) * out / np.sqrt(order)


def room(x, t60, wet_db, dull_hz, size=20000):
    """Many blurred echoes build up quickly and fade by 60 dB in t60 seconds, differently at each port."""
    t = np.arange(size) / SR
    tails = cut(rng.standard_normal((2, size)), min(dull_hz, SR * 4 / 9), "low", order=1)
    tails = tails * from_db(-60 * t / t60) * (1 - np.exp(-(40 * t / t60) ** 2))
    echoes = [signal.oaconvolve(x, tail / np.sqrt(np.sum(tail ** 2)))[:N] for tail in tails]
    return from_db(wet_db) * np.array(echoes)


def background():
    """A low 60 Hz hum, its level set by a table, with small random wavering, over room air of filtered noise."""
    # hum before the small random wavering: (time [s], rms level [dB])
    hum_level = [(0, -46.5), (1.3, -51.5), (1.65, -43), (2.4, -69), (2.6, -62), (2.7, -49.5), (3.06, -53.5),
                 (3.7, -48), (4.65, -49.5), (4.9, -60), (5.4, -50), (9.2, -51.5)]
    # tone colour of the room air: (frequency [Hz], level [dB])
    air_colour = [(25, -12.5), (50, 12), (85, 8), (160, -13.5), (500, -21.5), (8000, -45), (16000, -47.5)]
    time = np.arange(N) / SR
    strength = from_db(np.interp(time, *np.transpose(hum_level))) * (1 + 0.2 * drift(7))
    hum = strength * np.sqrt(2) * np.sin(2 * np.pi * 60 * time + 0.3 * drift(6))
    shared, left, right = [rms_one(colour(rng.standard_normal(N), air_colour)) for _ in range(3)]
    air = shared + 1.6 * cut(np.array([left, right]), 100, "high")   # the deep bass is the same on both sides
    return hum * from_db([[-0.5], [0.5]]) + from_db(-60.0) * air


def scene():
    """The hands work close to the ports; the small room answers."""
    handling = hits() + squeaks() + wrap() + rubbing()
    nearby = scatter(cut(handling, [1800, 9000], "band", order=1), wet_db=-5.0)
    echoes = room(handling, t60=0.17, wet_db=-16.0, dull_hz=4420)
    return ports(handling) + nearby + echoes + background()


def record(dry):
    """The microphone rolls off the deepest bass and colours the treble, and the top is cut at 16.3 kHz."""
    # colour of the microphone: (frequency [Hz], level [dB])
    mic_colour = [(8400, -0.5), (9700, -8), (11200, 2), (13500, 3.5), (14900, -9.5)]
    heard = cut(np.array([colour(side, mic_colour) for side in dry]), 32, "high", order=3)
    return signal.sosfiltfilt(signal.ellip(10, 0.1, 60, 16300, fs=SR, output="sos"), heard)


dry = scene()
out = record(dry)
output_pcm(out)
```